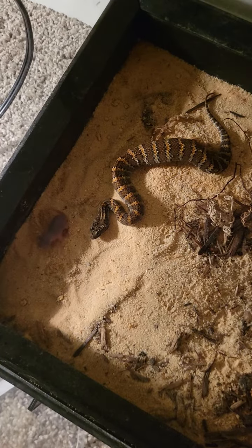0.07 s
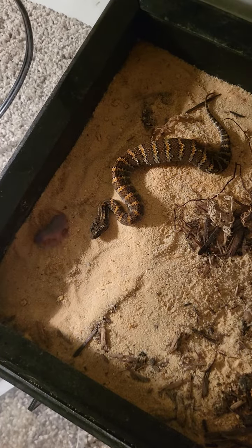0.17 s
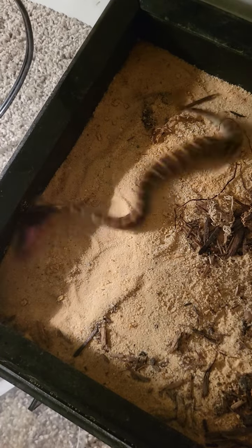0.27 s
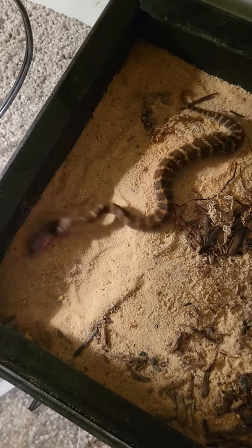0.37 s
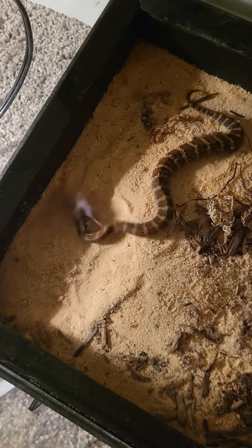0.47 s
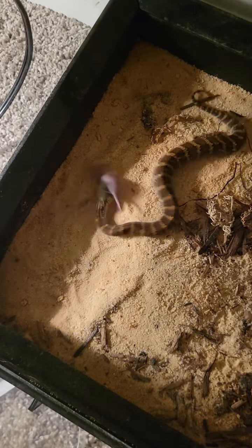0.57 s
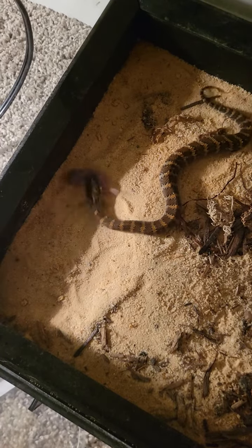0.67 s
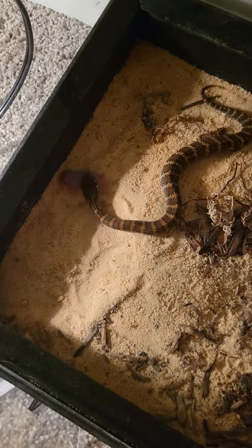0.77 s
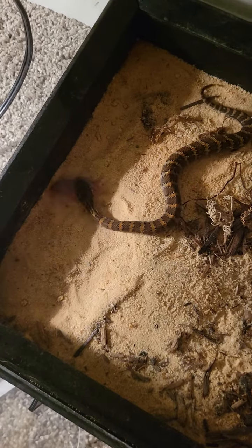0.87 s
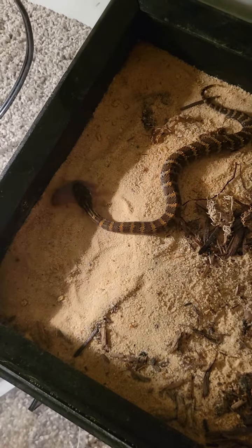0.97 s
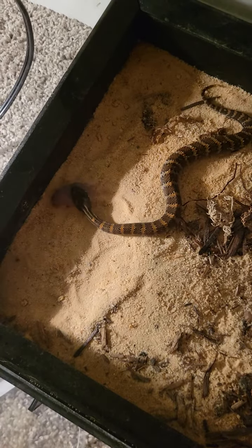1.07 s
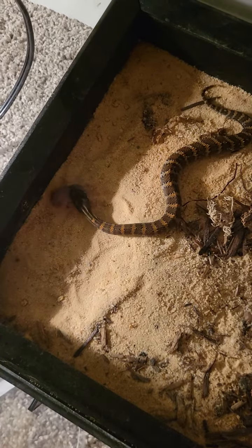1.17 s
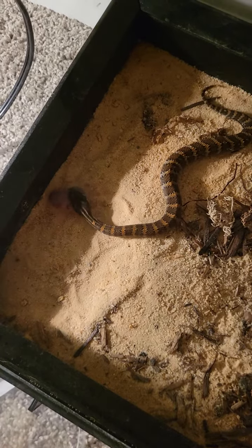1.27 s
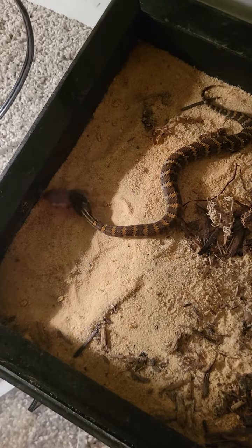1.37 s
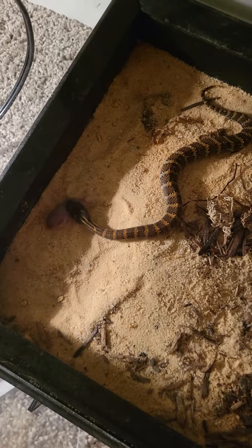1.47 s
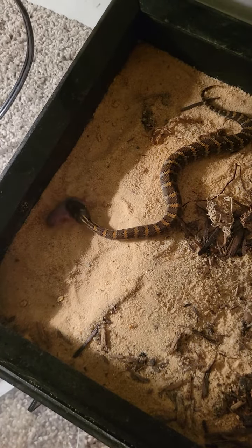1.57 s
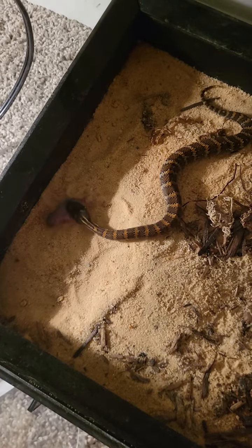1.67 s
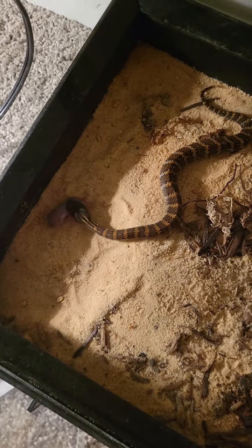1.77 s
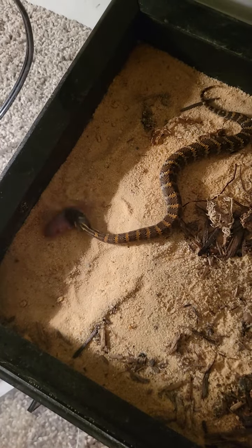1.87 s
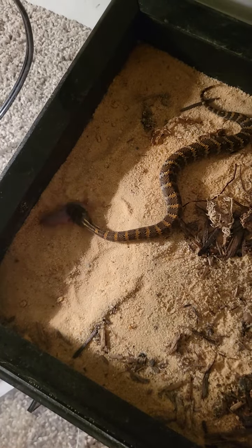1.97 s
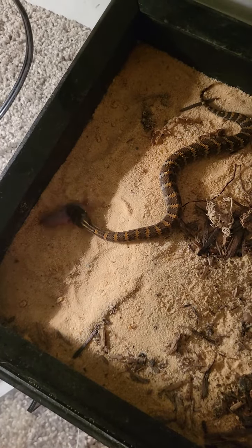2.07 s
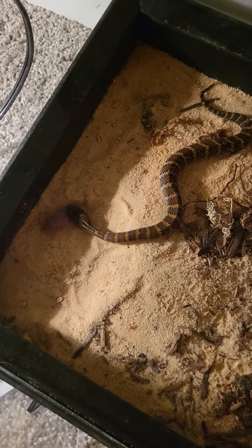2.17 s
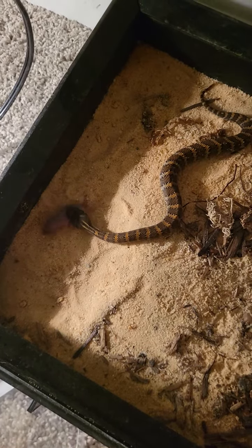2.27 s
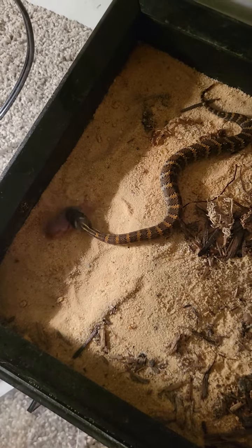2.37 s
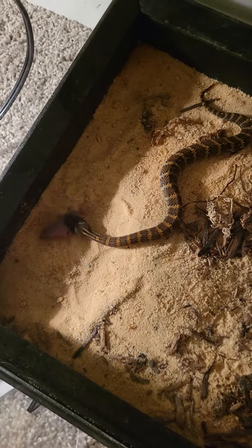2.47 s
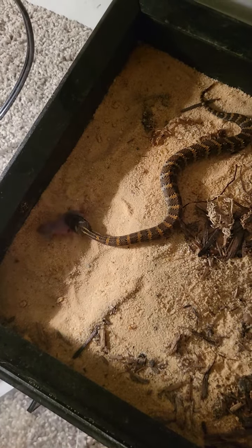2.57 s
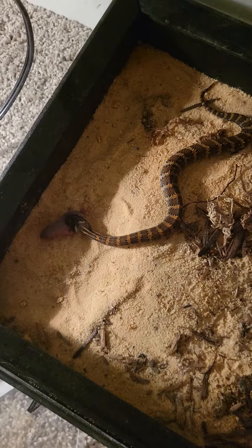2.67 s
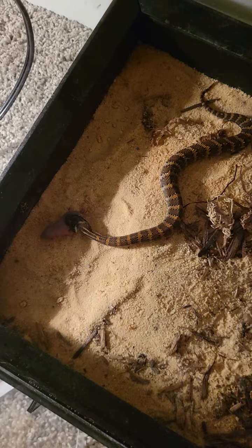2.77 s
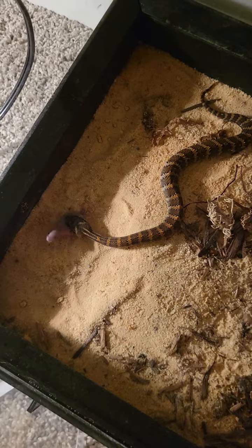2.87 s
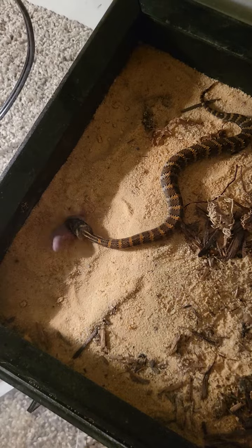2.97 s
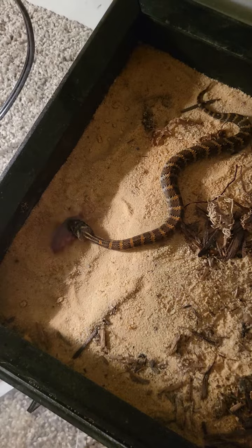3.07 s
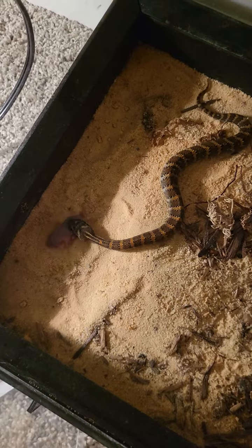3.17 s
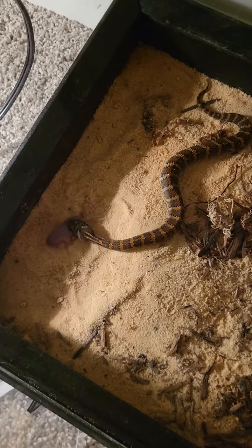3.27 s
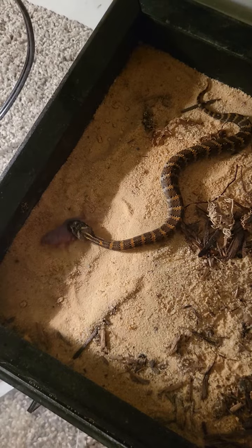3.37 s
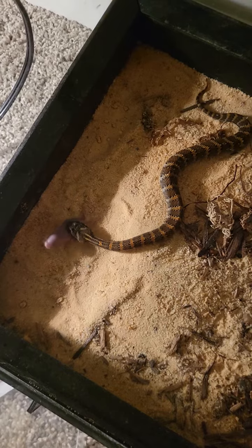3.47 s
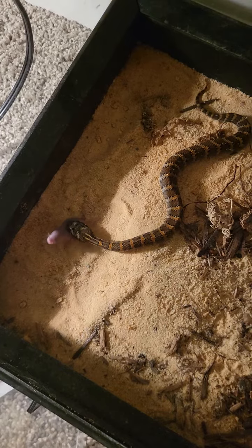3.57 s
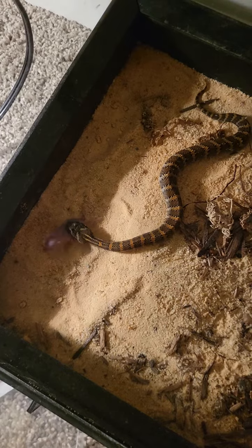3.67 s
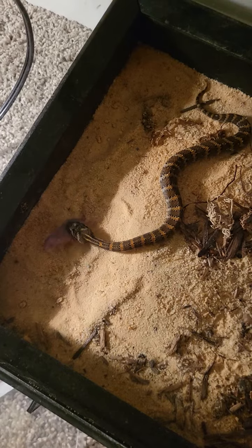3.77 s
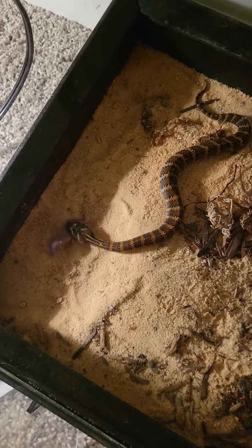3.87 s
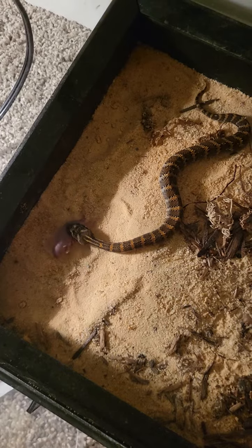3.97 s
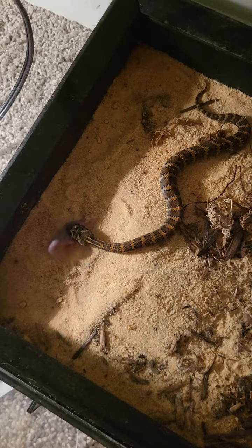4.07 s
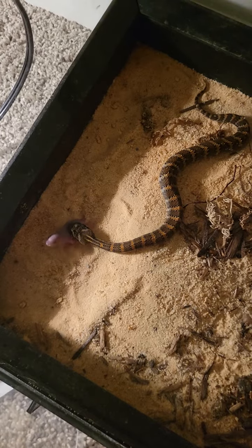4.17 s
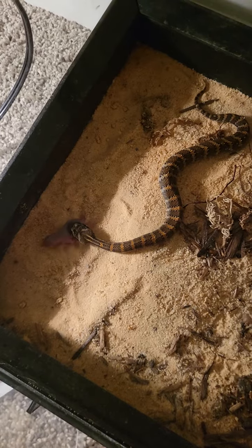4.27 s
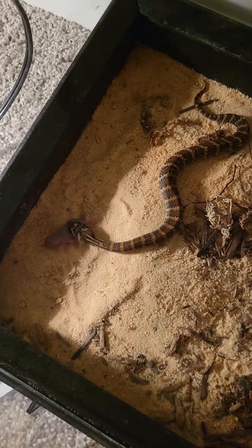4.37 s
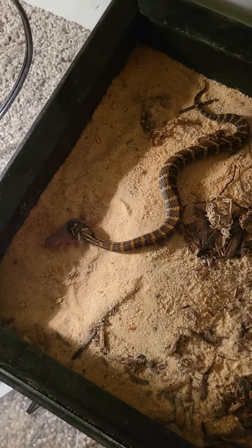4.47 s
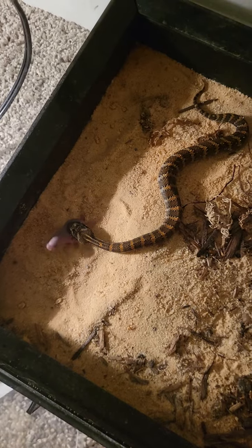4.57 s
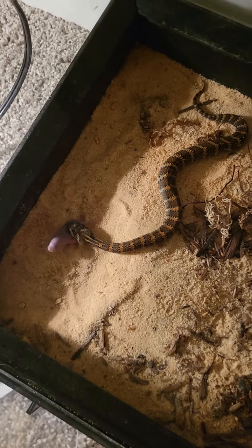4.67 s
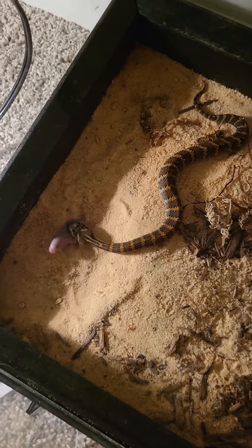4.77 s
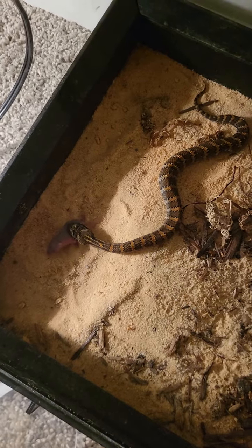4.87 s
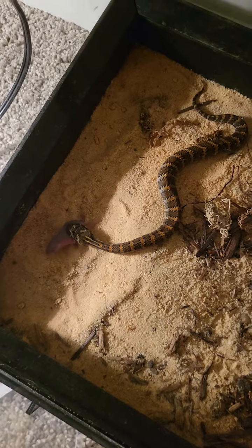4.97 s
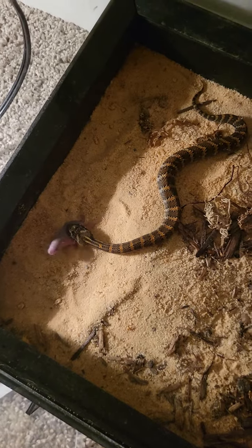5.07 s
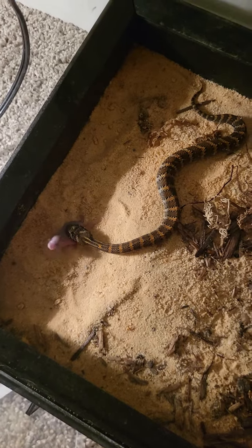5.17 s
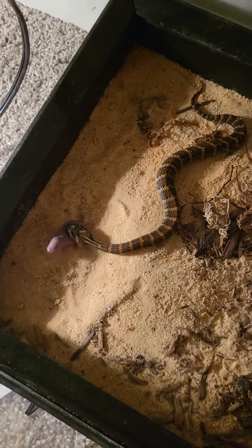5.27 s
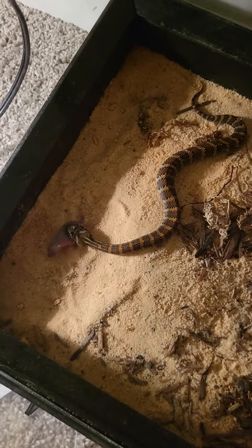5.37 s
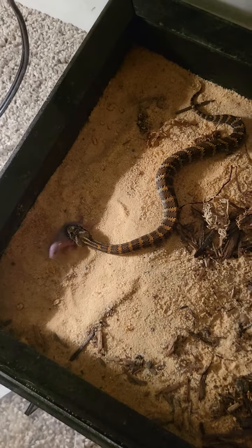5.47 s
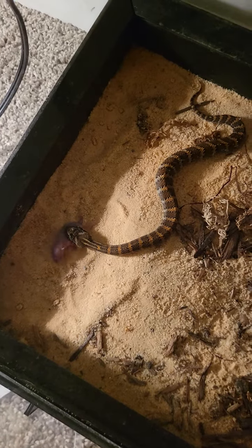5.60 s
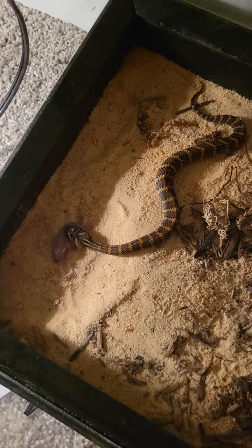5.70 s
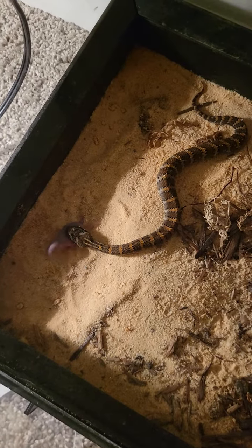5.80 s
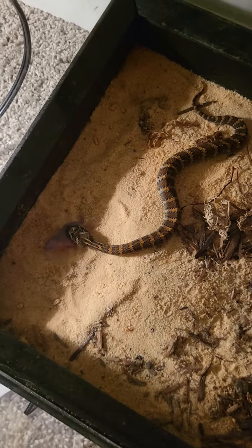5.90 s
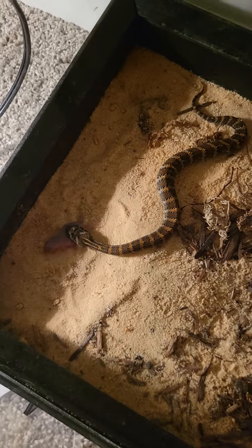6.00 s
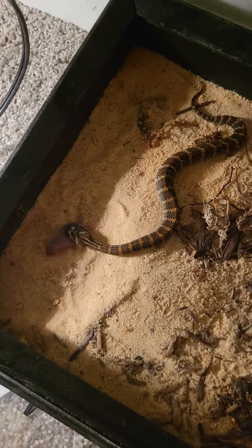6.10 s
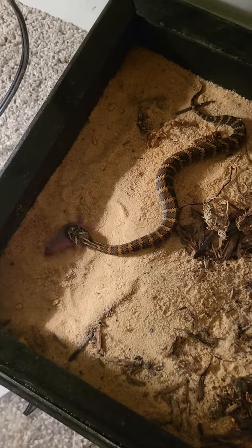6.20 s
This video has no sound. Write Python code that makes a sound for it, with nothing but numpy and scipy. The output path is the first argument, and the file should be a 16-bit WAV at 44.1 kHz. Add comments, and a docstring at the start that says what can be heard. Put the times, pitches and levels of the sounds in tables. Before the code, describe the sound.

A baby mouse gives a dozen short, harsh, falling squeaks that slow and weaken after a sandy scuffle, over a low indoor hum.

```python
"""In a sand-filled plastic tub, a small snake seizes a baby mouse, which gives twelve arched, falling squeaks
that slow down and weaken. Each is a rough harmonic tone with air noise pulsing at its pitch.
The strike first scuffs the sand (random grains); a soft thud (a swelling low tone) and a double knock
(noise and decaying modes) come later, among dull bumps and thin ticks (noise bursts).
An appliance hums in the room throughout, as a wavering sine over shaped noise for the still air."""
import sys
import numpy as np
from scipy import signal
from scipy.fft import rfft, irfft
from scipy.io import wavfile

SR = 44100
rng = np.random.default_rng(int(sys.argv[2]) if len(sys.argv) > 2 else 0)


def unload_audio(sound):
    """Save the sound as a 16-bit wav file, at the path given as the first command line argument."""
    columns = np.transpose(np.atleast_2d(sound))
    # keep every value between -1 and 1, then stretch to whole-number steps
    steps = np.round(np.clip(columns, -1, 1) * 32767)
    wavfile.write(sys.argv[1], SR, steps.astype(np.int16))


N = 275095
TIME = np.arange(N) / SR

# the pitch is held until HOLD_S; slack folds sink towards SLACK_HZ
HOLD_S, SLACK_HZ = 0.025, 1978


def squeak_pitch(t, length, rise_s, top_hz, sag_hz_per_s, collapse_s):
    """Fold tension sets the pitch: it leaps from an octave below, holds, sags and collapses as the folds slacken."""
    held = top_hz - sag_hz_per_s * np.maximum(t - HOLD_S, 0)
    slack = np.exp((t - length) / collapse_s)
    leap = 1 - 0.5 * np.exp(-(t / rise_s) ** 1.5)
    return leap * (held + (SLACK_HZ - held) * slack)


# loudness: a cry swells from below and drops as it lets go
ATTACK_S, ATTACK_DB = 0.0068, -28
RELEASE_S, RELEASE_DB = 0.014, -9
# a cry pitched above the easy pitch runs out of air and fades; one below it swells
EASY_PITCH_HZ, FADE_DB_PER_OCTAVE = 4230, 26
# the folds are rough until they settle, nearly clean in the middle, and fray towards the end
SETTLE_S, FRAY_S, STEADY_ROUGH = 0.015, 0.035, 0.05
# brightness in dB per octave: harsh at either end, duller for each octave of sag
ONSET_BRIGHT_DB, END_BRIGHT_DB, SAG_DULL_DB = 4, 4.5, 5
ONSET_HARSHNESS = 0.28  # extra onset brightness, dB per octave for each dB of hoarseness
# 2nd and 3rd harmonic over the fundamental (dB), and the share of the hoarseness that they take on
SECOND_DB, THIRD_DB, HOARSE_SHARE = 1.5, 0.5, 0.23
# relative spectrum of the breathy rasp: frequency_hz, density_db (per Hz)
RASP = [(1300, -49), (2300, -22.5), (3500, -5.5), (6000, 1), (7800, -14.5), (9800, 1), (12000, 4.5),
        (15000, -3), (18000, -12.5)]


def squeak(row, jitter=0.035, jitter_hz=700, waver=0.0018, flutter_db=3.5, rasp_db=-11, upper_db=-1.0, count=4):
    """Voiced source: vibrating folds give harmonics, roughened at onset and release, and modulate the air."""
    start, length, rise_s, top_hz, sag_hz_per_s, collapse_s, level_db, hoarse_db = row
    size = int(length * SR)
    t = TIME[:size]
    left = length - t
    pitch = squeak_pitch(t, length, rise_s, top_hz, sag_hz_per_s, collapse_s)

    starting = np.exp(-(t / SETTLE_S) ** 2)
    fraying = np.exp(-(left / FRAY_S) ** 2)
    letting_go = np.exp(-(left / RELEASE_S) ** 2)
    rough = STEADY_ROUGH + starting + fraying

    sunk_octaves = np.log2(top_hz / pitch) * (t > HOLD_S)
    onset_bright_db = ONSET_BRIGHT_DB + ONSET_HARSHNESS * hoarse_db
    bright_db = onset_bright_db * starting + END_BRIGHT_DB * letting_go - SAG_DULL_DB * sunk_octaves

    fade_db = FADE_DB_PER_OCTAVE * np.log2(top_hz / EASY_PITCH_HZ) * (t / length - 0.5)
    shape_db = ATTACK_DB * np.exp(-t / ATTACK_S) + RELEASE_DB * letting_go - fade_db

    fast = jitter * rough * drift(jitter_hz, size=8192)[:size]
    slow = waver * drift(45, size=8192)[:size]
    phase = 2 * np.pi * np.cumsum(pitch * (1 + fast + slow)) / SR

    pressed_db = HOARSE_SHARE * hoarse_db
    harmonics_db = [0, SECOND_DB + pressed_db, THIRD_DB + pressed_db] + [upper_db + hoarse_db] * count
    voice = np.zeros(size)
    for k, harmonic_db in enumerate(harmonics_db, 1):
        flutter = flutter_db * drift(73, size=8192)[:size]
        gain = from_db(harmonic_db + bright_db * np.log2(k) + flutter)
        # harmonics fade out before half the sample rate
        in_range = np.clip((SR / 2 - k * pitch) / 3000 - 1, 0, 1)
        voice += gain * in_range * np.sin(k * phase)

    # air rushes through the folds in every cycle
    air = coloured(rng.standard_normal(8192), RASP)[:size] * (1 + 0.98 * np.sin(phase))
    voice += from_db(rasp_db + hoarse_db / 2 + 2 * bright_db) * np.sqrt(rough) * air
    edges = np.clip(np.minimum(t, left) / 0.0019, 0, 1)
    return voice * edges * from_db(level_db + shape_db)


# the cries: start_s, length_s, rise_s (upward leap), top_hz, sag_hz_per_s,
# collapse_s (final fall of pitch), level_db, hoarse_db
SQUEAKS = [(0.561, 0.11, 0.0063, 5480, 7000, 0.022, -37, 3),
           (0.809, 0.12, 0.01, 4964, 12500, 0.0095, -36.5, -8),
           (1.074, 0.14, 0.0069, 4545, 12206, .0065, -38.5, -5.5),
           (1.38, 0.11, 0.0088, 4804, 4996, 0.032, -41.5, -2),
           (1.671, .12, 0.0065, 4957, 13304, 0.011, -38, 1),
           (1.985, 0.12, 0.0078, 4657, 16205, 0.0038, -39, -1.5),
           (2.317, 0.14, 0.0053, 4528, 3998.5, 0.011, -41.5, 3.5),
           (2.674, 0.11, 0.0083, 4562, 14499, 0.006, -41, -1),
           (3.283, .121, .012, 4157, -6, .016, -41.5, 1.5),
           (3.974, 0.081, 0.0083, 3746, 12490, 0.0044, -44, -1),
           (4.332, .088, .007, 4060, 17002, 0.0085, -42, 0),
           (4.717, 0.051, 0.0075, 3830, 8500, .011, -47, 4.5)]


def mouse(lowest_hz=1900):
    """Radiation efficiency: so small a mouth radiates nothing low, so the cries are high-passed."""
    out = np.zeros(N)
    for row in SQUEAKS:
        cry, at = squeak(row), round(row[0] * SR)
        out[at:at + len(cry)] += cry
    return signal.sosfilt(signal.butter(4, lowest_hz, "high", fs=SR, output="sos"), out)


# colour of throat and tub at each ear: frequency_hz, left_db, right_db
VOICE_COLOUR = [(2300, 7, -2.5), (3460, -19, -3.5), (3580, 7, 13), (4600, 1.5, -9), (5523, 2, -10.5),
                (5930, 1.5, -8), (7080, 8.5, -1.5), (8300, -2.5, -8), (9200, -0.5, -9.5), (10250, -8.5, -6),
                (10820, 6, -0.5), (11900, 5.5, 5), (13400, 6.5, 10.5), (15000, 5.5, 2.5),
                (15900, -13, -12.5)]


def from_tub(x, right_lag_s=0.0003949):
    """Interaural difference: the way out colours a cry differently for each ear, and the left hears it first."""
    left = filtered(x, VOICE_COLOUR, axis=1)
    right = filtered(x, VOICE_COLOUR, axis=2)
    return np.array([left, np.interp(TIME - right_lag_s, TIME, right)])


# sand slides as the snake lunges and as it lands: start_s, swell_s, level_db, t60_s
SCUFFS = [(.255, 0.03, -60, 1.6), (.5, .09, -64.5, 0.58)]
# relative spectrum of the slides: frequency_hz, density_db (per Hz)
SCUFF_COLOUR = [(150, -34.5), (300, 7), (600, -5.5), (1150, -3.5), (2000, -10.5), (3500, -16), (7000, -15),
                (10000, -27), (15000, -21)]
# sharp crunches of sand: start_s, level_db, t60_s
CRUNCHES = [(.294, -46.5, 0.049), (0.445, -44.5, 0.09), (0.452, -51.5, 0.037)]
# relative spectrum of the crunches: frequency_hz, density_db (per Hz)
CRUNCH_COLOUR = [(400, -28), (1200, -21), (2200, 5.5), (3200, -11.5), (5500, 0), (7500, 0.5), (10000, -18),
                 (14000, -20)]


def sand(grains_per_s=5000, spread_db=-3.0, scuff_pan_db=6.5, crunch_pan_db=5.5):
    """Granular friction: random impulses of slipping grains make two sliding scuffs and a few short crunches."""
    struck = rng.random(N) < grains_per_s / SR
    sizes = from_db(spread_db * rng.standard_normal(N))
    grains = struck * sizes * rng.standard_normal((2, N))
    slide = np.zeros(N)
    for s, swell, db, t60 in SCUFFS:
        rise = np.clip((TIME - s) / swell, 0, 1)
        decay = from_db(-60 * np.maximum(TIME - s - swell, 0) / t60)
        slide += from_db(db) * rise * decay
    crunch = sum(from_db(db) * dying(s, t60) for s, db, t60 in CRUNCHES)
    scuffs = pan(scuff_pan_db) * slide * coloured(grains, SCUFF_COLOUR)
    return scuffs + pan(crunch_pan_db) * crunch * coloured(grains, CRUNCH_COLOUR)


# dull bumps of the struggle: start_s, level_db, pitch_hz, t60_s
BUMPS = [(0.301, -46, 634, 0.042), (.336, -42, 1110, 0.019), (.349, -52, 994, 0.13),
         (0.511, -55.5, 1236, .07), (4.844, -57.5, 390, 0.17)]


def bumps(pan_db=10.0):
    """Damped impact: soft bodies hit the sand in short dull noise bursts, each around one pitch."""
    out, noise = 0, rng.standard_normal((2, N))
    for s, db, hz, t60 in BUMPS:
        band_pass = signal.butter(2, [hz / 1.3, hz * 1.3], "band", fs=SR, output="sos")
        band = rms_one(signal.sosfilt(band_pass, noise))
        out = out + from_db(db) * dying(s, t60) * band
    return pan(pan_db) * out


# knocks on plastic: start_s, level_db, click_hz
KNOCKS = [(5.0558, -33.5, 2060), (5.1038, -29.5, 2680)]
# what the knocks ring with: frequency_hz, level_db (over the knock), t60_s, left_over_right_db
KNOCK_MODES = [(211.6, -5.5, 0.072, 11), (250, -31, 0.072, 8), (363, -14, 0.14, 7.5), (640, -19, 0.076, 10),
               (1620, -20.5, 0.045, 16.5), (1820, -36, 0.035, -7), (2256, -16.5, 0.023, -31),
               (3280, -10, 0.024, -8)]
# relative spectrum of the crack: frequency_hz, density_db (per Hz)
CRACK = [(300, -7), (700, 0), (1100, -11.5), (1700, -1), (2800, -3), (4500, -7.5), (7000, -13),
         (10000, -28), (15000, -20)]


def knocks(click_t60=0.0086, click_db=7.5, click_pan_db=-5, crack_db=-11, crack_t60=0.072):
    """Modal excitation: a bright click and a crack set off the hollow, decaying modes of the plastic."""
    out = np.zeros((2, N))
    crack = coloured(rng.standard_normal((2, N)), CRACK)
    for s, db, click_hz in KNOCKS:
        out += from_db(db + crack_db) * crack * dying(s, crack_t60)
        click = (click_hz, click_db, click_t60, click_pan_db)
        for hz, mode_db, t60, pan_db in [*KNOCK_MODES, click]:
            # low modes take longer to build up
            envelope = dying(s, t60, attack=0.001 + 1 / hz)
            ring = envelope * np.sin(2 * np.pi * hz * (TIME - s))
            out += pan(pan_db) * from_db(db + mode_db) * ring
    return out


# thin ticks between the cries: start_s, level_db
TICKS = [(2.991, -62), (3.082, -46), (3.104, -60), (4.089, -61), (4.787, -56)]


def ticks(t60=0.024, pan_db=8.0):
    """Transient noise: tiny bright snaps with a quick rise and exponential decay."""
    snaps = sum(from_db(db) * dying(s, t60) for s, db in TICKS)
    spectrum = [(1500, -6), (4500, -14), (9500, -4), (14000, 3.0), (16000, 5.5), (18000, -30)]
    return pan(pan_db) * snaps * coloured(rng.standard_normal((2, N)), spectrum)


def thud(at_s=2.366, width_s=0.028, hz=125, db=-36):
    """Gaussian tone burst: a soft low boom swells and fades within a few cycles."""
    return from_db(db) * np.exp(-((TIME - at_s) / width_s) ** 2) * np.sin(2 * np.pi * hz * TIME)


def wall_echo(x, left_s=0.01, right_s=0.0135):
    """Specular reflection: one hard surface answers a moment later, at its own delay for each ear."""
    return np.array([np.pad(ear, (round(lag * SR), 0))[:N] for ear, lag in zip(x, (left_s, right_s))])


def echoes(x, t60, delay, dull_hz):
    """Diffuse reverberation: dense reflections, different at each ear, start after a delay and die away."""
    t = TIME[:SR]
    decay = from_db(-60 * np.minimum(t / t60, 2))
    onset = np.clip(t / delay - 1, 0, 1)
    tail = rng.standard_normal((2, SR)) * decay * onset
    tail /= np.sqrt(np.sum(tail ** 2, axis=1, keepdims=True))
    low_pass = signal.butter(1, min(dull_hz, 0.45 * SR), fs=SR, output="sos")
    tail = signal.sosfilt(low_pass, tail)
    return signal.fftconvolve(x, tail, axes=1)[:, :N]


HUM_HZ, HUM_DB = 59.5, -40  # mean frequency; rms level before panning


def hum(waver_db=1.04, wander_hz=0.031):
    """Motor slip: an induction motor turns just under the mains rate, its level and pitch wavering."""
    phase = 2 * np.pi * np.cumsum(HUM_HZ + wander_hz * drift(5.5, size=N)) / SR
    return from_db(HUM_DB + waver_db * drift(3.8, size=N)) * np.sqrt(2) * np.sin(phase)


# still air of the room before panning: frequency_hz, density_db (per Hz)
AIR = [(22, -100), (30, -76), (38, -68), (55, -73), (95, -77), (125, -75), (160, -83), (210, -87),
       (300, -96), (450, -102), (800, -110.5), (1500, -112), (2500, -116.5), (5000, -121), (6700, -119),
       (9000, -125), (13500, -121)]
# left-right likeness of the air: frequency_hz, correlation (0-1)
LIKENESS = [(60, 1), (130, 0.94), (300, 0.41), (700, 0.8), (2000, 0.17), (8000, 0.039)]


def room_air(pan_db=1.0):
    """Interaural coherence: both ears share the rumble, which thins to a hiss that they do not."""
    hz = np.fft.rfftfreq(N, 1 / SR)
    alike = np.clip(at_hz(LIKENESS, hz), 0, 1)
    mid, side = rfft(rng.standard_normal((2, N))) * np.sqrt(SR) / 2
    ears = np.sqrt(1 + alike) * mid + np.sqrt(1 - alike) * side * [[1], [-1]]
    return pan(pan_db) * irfft(ears * from_db(at_hz(AIR, hz)), N)


def from_db(db):
    """Logarithmic level: decibels to amplitude gain."""
    return 10 ** (np.asarray(db) / 20)


def rms_one(x):
    """Effective value: scale to an rms of one."""
    return x / np.sqrt(np.mean(x ** 2) + 1e-20)


def at_hz(points, hz, axis=1):
    """Logarithmic frequency scale: interpolate one column of a table along it."""
    table = np.array(points)
    return np.interp(np.log(np.maximum(hz, 1)), np.log(table[:, 0]), table[:, axis])


def pan(db):
    """Interaural level difference: gains of the two ears for a left-over-right level."""
    return from_db(np.array([[db], [-db]]) / 2)


def drift(rate, size):
    """Low-passed noise: smooth chance that turns about `rate` times a second, with an rms of one."""
    hz = np.fft.rfftfreq(size, 1 / SR)
    spectrum = rfft(rng.standard_normal(size)) / (1 + (hz / rate) ** 2)
    return rms_one(irfft(spectrum, size))


def coloured(x, spectrum):
    """Spectral shaping: give noise a spectrum, with an rms of one."""
    size = x.shape[-1]
    gain = from_db(at_hz(spectrum, np.fft.rfftfreq(size, 1 / SR)))
    return rms_one(irfft(rfft(x) * gain, size))


def filtered(x, colour, axis=1):
    """Linear filtering: convolve a sound with the response in one column of a colour table."""
    hz = np.linspace(0, SR / 2, 257)
    response = signal.firwin2(97, hz, from_db(at_hz(colour, hz, axis=axis)), fs=SR)
    return np.convolve(x, response, "same")


def dying(start, t60, attack=0.0037):
    """Exponential decay: an envelope climbs quickly, then loses 60 dB in every t60."""
    age = TIME - start
    return np.clip(age / attack, 0, 1) * from_db(-60 * np.clip(age / t60, 0, 2))


# colour of the cries as they spread into the room: frequency_hz, gain_db
SPREAD_COLOUR = [(2300, 5.5), (3700, -3), (4800, -1.5), (7300, 0.5), (9400, -6), (12500, 3), (15000, 1)]


def scene(direct_db=0.5, tub_db=-8, wall_db=-16, spread_db=2.0, room_db=-19):
    """Superposition: sounds bounce between the walls of the tub, then fade in a carpeted room."""
    cries = mouse()
    struggle = sand() + bumps() + knocks() + ticks()
    near = from_db(direct_db) * from_tub(cries) + struggle
    radiated = from_db(spread_db) * filtered(cries, SPREAD_COLOUR) + struggle
    tub = from_db(tub_db) * echoes(near, t60=0.098, delay=0.0012, dull_hz=14200)
    wall = from_db(wall_db) * wall_echo(radiated)
    room = from_db(room_db) * echoes(radiated, t60=0.39, delay=0.015, dull_hz=10180)
    low = pan(2.685) * (hum() + thud())
    return near + tub + wall + room + low + room_air()


def record(dry, cutoff_hz=16000):
    """Band limiting: a steep elliptic low-pass cuts off the top."""
    return signal.sosfilt(signal.ellip(10, 0.1, 80, cutoff_hz, fs=SR, output="sos"), dry)


dry = scene()
out = record(dry)
unload_audio(out)
```